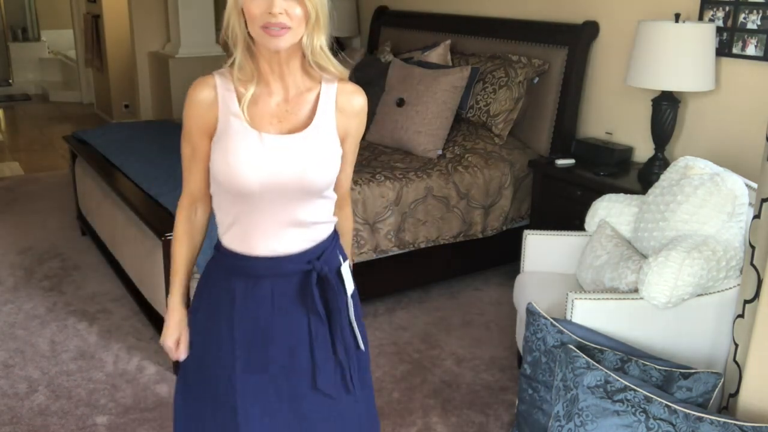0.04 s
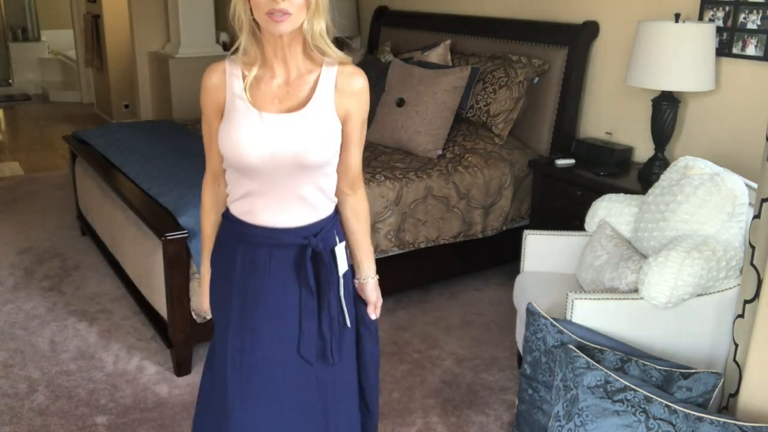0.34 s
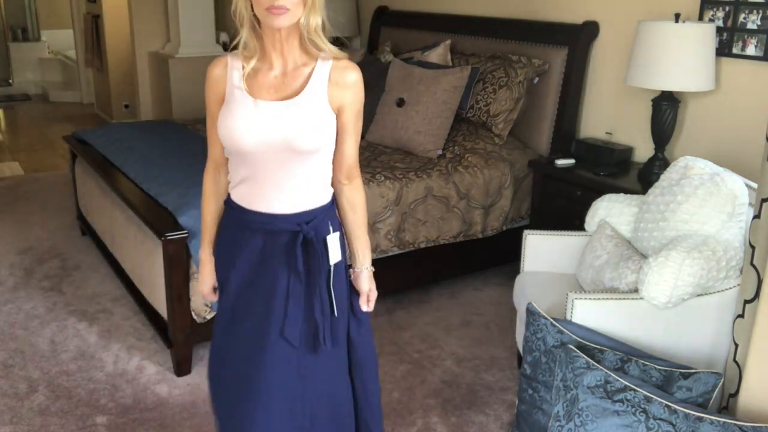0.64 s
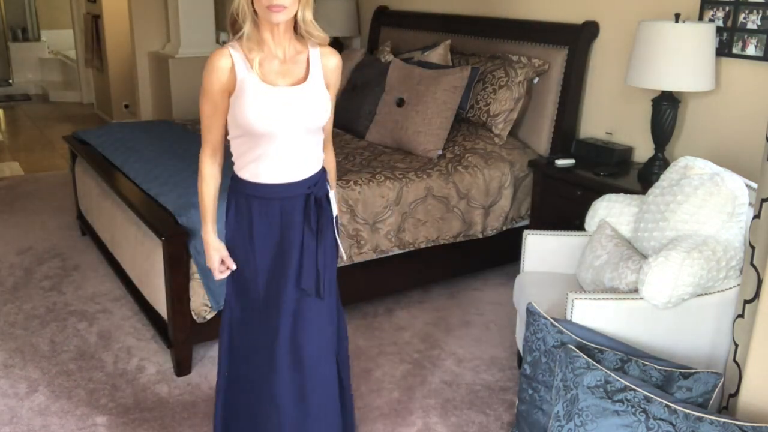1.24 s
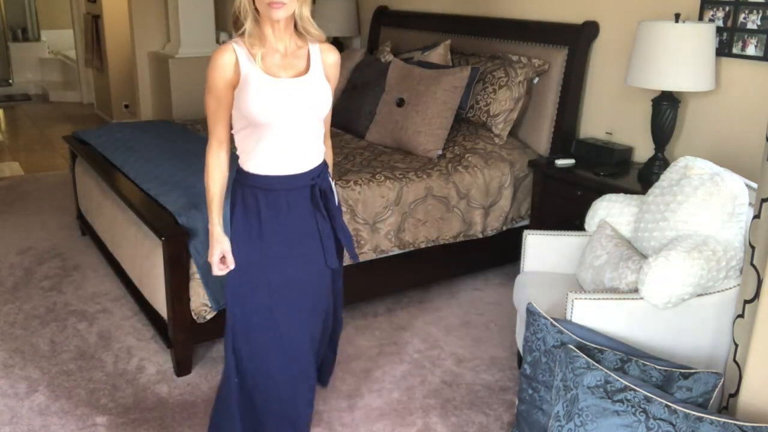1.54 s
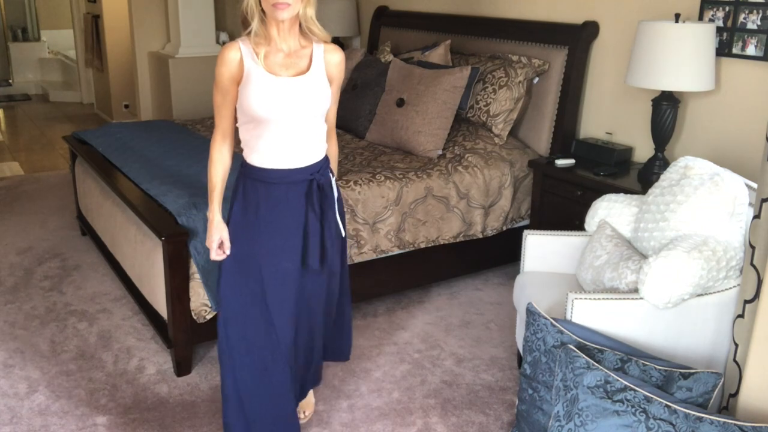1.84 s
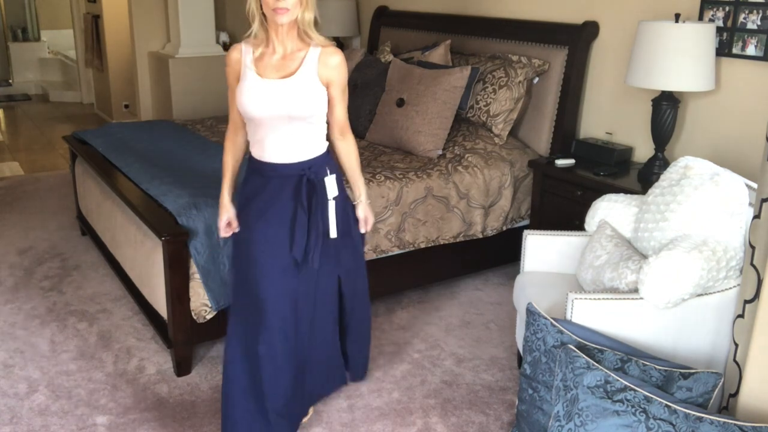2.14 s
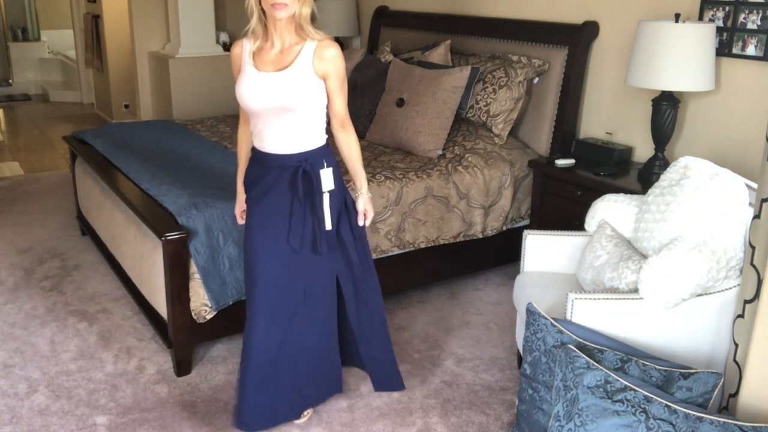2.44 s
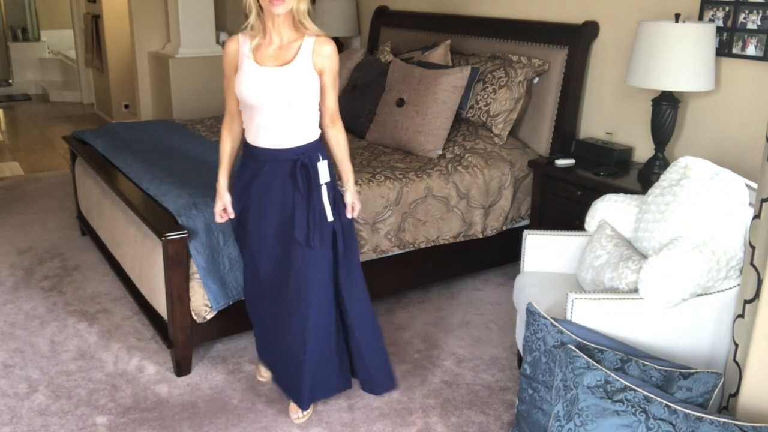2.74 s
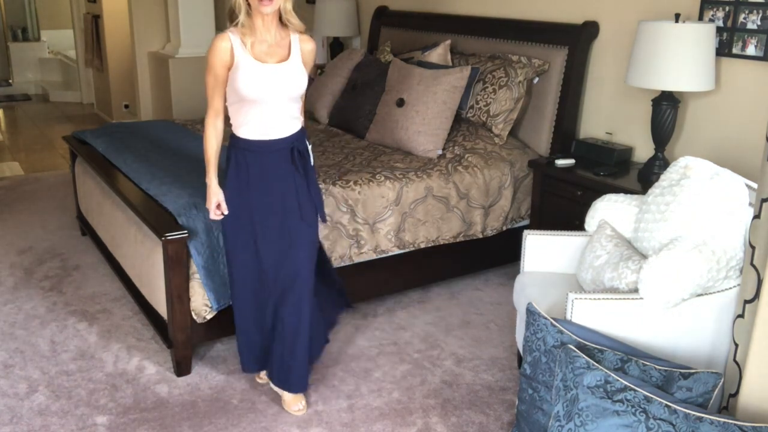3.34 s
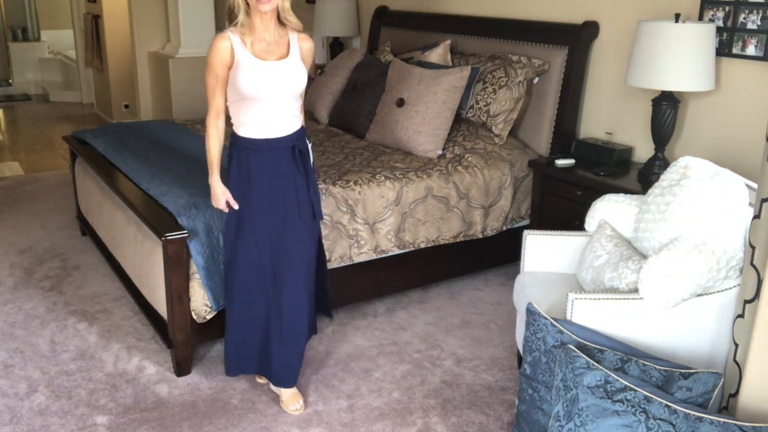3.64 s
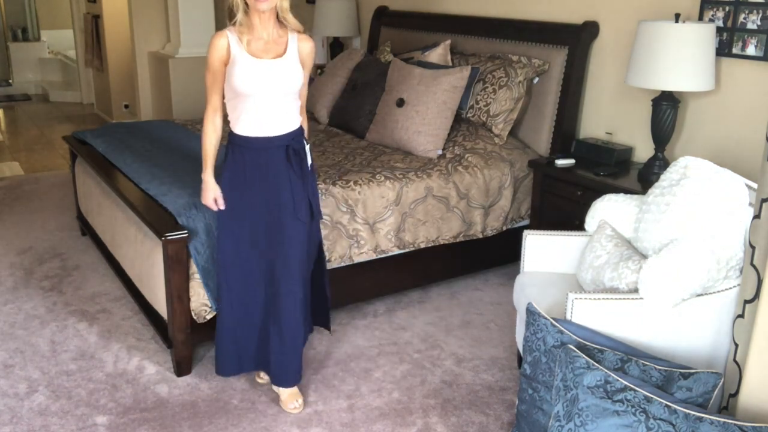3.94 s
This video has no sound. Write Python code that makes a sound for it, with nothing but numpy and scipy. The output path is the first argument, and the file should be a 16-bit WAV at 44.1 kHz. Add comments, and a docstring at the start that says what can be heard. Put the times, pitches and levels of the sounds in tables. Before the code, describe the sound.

Soft sandal footsteps on carpet with a swishing skirt, over a low ventilation rumble.

```python
"""A quiet, carpeted bedroom, one microphone close to someone stepping slowly backwards.
Ventilation rumbles under a thin microphone hiss throughout. At once sandals scuff the carpet,
a long skirt swishes, and something small and light on the clothing rubs and ticks as it swings.
Soft footfalls follow from about 0.6 s. Later come two faint tones, each followed by a light
sandal tap, and the last swishes and ticks die away near 3.5 s."""
import sys
import numpy as np
from scipy import signal
from scipy.fft import rfft, irfft
from scipy.io import wavfile

SR = 44100
rng = np.random.default_rng(int(sys.argv[2]) if len(sys.argv) > 2 else 0)


def transcribe(u):
    """Save the signal u as a 16-bit wav file named by the first command-line argument.

    u: samples, shape (n,) or (channels, n), limited to [-1, 1]; the rate is SR.
    q: integer samples, one column per channel.
    """
    v = np.clip(np.atleast_2d(u).T, -1, 1)
    q = np.round(v * 32767).astype(np.int16)
    wavfile.write(sys.argv[1], SR, q)


N = 176400


def undb(db):
    """Decibels to gain."""
    return 10 ** (np.asarray(db) / 20)


def unit(x):
    """Scale to rms 1."""
    return x / np.sqrt(np.mean(x ** 2))


def noise():
    """White noise of rms 1."""
    return rng.standard_normal(N)


def since(start):
    """Seconds since a moment, for every sample."""
    return np.arange(N) / SR - start


def fade(t, decay):
    """Sudden start, exponential fall."""
    return (t >= 0) * np.exp(-np.abs(t) / decay)


def swell(t, rise, fall):
    """A rounded rise to a peak at t = 0, then an exponential fall."""
    return np.exp(np.where(t < 0, -(t / rise) ** 2, -np.abs(t) / fall))


def at_level(x, db):
    """Give a short sound its level, with its energy taken over 20 ms."""
    return undb(db) * x * np.sqrt(.02 * SR / np.sum(x ** 2))


def band(x, hz, q):
    """A resonance applied twice, for steep slopes."""
    b, a = signal.iirpeak(hz, q, fs=SR)
    return signal.lfilter(b, a, signal.lfilter(b, a, x))


def colour(x, points, tilt_db=0):
    """Causal filter through (Hz, dB) points, tilted per octave; white noise keeps its power."""
    hz, db = np.array(points, float).T
    octave = np.log2(np.maximum(np.fft.rfftfreq(N, 1 / SR), 1))
    curve_db = np.interp(octave, np.log2(hz), db) + tilt_db * np.maximum(octave, np.log2(hz[0]))
    cepstrum = irfft(np.log(unit(undb(curve_db))), N)
    cepstrum[1:N // 2] *= 2  # folded for minimum phase
    cepstrum[N // 2 + 1:] = 0
    impulse = irfft(np.exp(rfft(cepstrum)), N)
    return irfft(rfft(x, 2 * N) * rfft(impulse, 2 * N))[:N]


def grains(per_s, spread_db=5):
    """Threads catch and slip: uneven little impulses, rms 1."""
    catches = rng.random(N) < per_s / SR
    return unit(catches * np.sign(noise()) * undb(spread_db * noise()))


# Room tone, the spectrum of the moving air: f/Hz, relative level/dB
AIR_SPECTRUM = [(4, 2), (13, 1), (22, -5.5), (30, -14), (45, -17.5), (70, -24), (105, -34.5), (170, -40),
                (250, -46.5), (400, -50.5), (600, -55.5), (1150, -57.5), (1750, -65), (3000, -69.5),
                (6000, -79.5)]
# Low resonances of the ducts and the room: f/Hz, half-width/Hz, level/dB
DUCT_DRONES = [(43, 0.95, -51.5), (60.3, 2.5, -53.5), (89.04, 3.55, -55), (122.74, 2.5, -61.5),
               (128.6, 11, -61), (410.1, 4, -79.5)]

def ventilation(air_db=-27.5):
    """Steady rumble of moving air, with narrow resonances in the bass."""
    f = np.maximum(np.fft.rfftfreq(N, 1 / SR), 1)
    hz, db = np.array(AIR_SPECTRUM).T
    air_gain = undb(np.interp(np.log(f), np.log(hz), db))
    out = undb(air_db) * unit(irfft(rfft(noise()) * air_gain, N))
    for centre, width, level_db in DUCT_DRONES:
        resonance = 1 / (1 + ((f - centre) / width) ** 2)
        out += undb(level_db) * unit(irfft(rfft(noise()) * resonance, N))
    return out


# Soles on the carpet: peak t/s, rise/s, fall/s, level/dB, tilt/(dB/octave), rasp f/Hz, rasp level/dB
SOLE_SCUFFS = [(.045, 0.33, 0.12, -59.5, -3, 3850, -72.5), (0.105, 0.005, 0.0072, -70, -1, 2000, -62),
               (.5, 0.046, 0.44, -67, -2.5, 3000, -82), (.86, 0.026, 0.091, -66, -4, 3000, -80),
               (1.0, 0.062, 0.081, -69.5, -2, 2310, -73.5), (1.203, 0.0045, 0.017, -53, -15, 2670, -70),
               (1.731, 0.053, 0.088, -78, -3.5, 2800, -75), (2.165, 0.12, 0.08, -65.5, -2.5, 3280, -76.5),
               (2.33, 0.093, 0.078, -66.5, -6, 1250, -73.5), (2.565, 0.043, 0.49, -68, -3.5, 3070, -78.5),
               (2.77, 0.12, 0.41, -64.5, -9, 5260, -81.5), (3.14, 0.026, 0.15, -66.5, 1, 3130, -75.5),
               (3.4, .04, 0.08, -82, 4, 2820, -80)]
# Spectrum of a brushing sole: f/Hz, relative level/dB
SOLE_SPECTRUM = [(150, -7), (400, -5), (900, 2), (1800, -5.5), (3300, -11.5), (5500, -7.5), (10000, -9.5),
                 (16000, -7)]

def scuffs():
    """Down at the floor, soles brush softly through the carpet pile, whose fibres rasp."""
    out = 0
    for peak, rise, fall, db, tilt_db, rasp_hz, rasp_db in SOLE_SCUFFS:
        brush = undb(db) * colour(noise(), SOLE_SPECTRUM, tilt_db)
        rasp = undb(rasp_db) * unit(band(noise(), rasp_hz, q=2.2))
        out += (brush + rasp) * swell(since(peak), rise, fall)
    return out


# The small piece dragging on the cloth: peak t/s, rise/s, fall/s, level/dB, resonance f/Hz
PIECE_RUBS = [(.072, .01, .012, -72, 3400), (.095, 0.032, 0.02, -77, 4350),
              (.985, 0.0089, 0.032, -66.5, 2320), (1.003, 0.019, 0.099, -73, 3500)]

def rubs():
    """Around its first ticks the light piece drags over the weave: a soft, papery rustle."""
    out = 0
    for peak, rise, fall, db, hz in PIECE_RUBS:
        rustle = unit(band(grains(per_s=1200), hz, q=2.5))
        out += undb(db) * rustle * swell(since(peak), rise, fall)
    return out


# Swings of the skirt: peak t/s, rise/s, fall/s, level/dB, tilt/(dB/octave)
SKIRT_SWISHES = [(0.097, 0.017, 0.01, -54.5, 12.5), (.36, 0.072, 0.066, -70.5, -2),
                 (.52, 0.018, 0.027, -71, 10), (.66, 0.068, 0.14, -75, 6), (.997, 0.018, 0.046, -68, 2),
                 (1.088, 0.078, 0.076, -68, 1), (1.53, 0.049, 0.037, -72.5, -0.5),
                 (2.6, 0.077, 0.047, -78, -1), (3.157, .01, .012, -74, 5), (3.196, 0.009, 0.011, -62, -0.5),
                 (3.38, 0.023, .025, -66.5, -6.5), (3.484, .009, .012, -71, -10.5)]
# Spectrum of the cloth, heard close: f/Hz, relative level/dB
CLOTH_SPECTRUM = [(500, -15), (2000, 1.5), (4000, -3.5), (5500, 3), (8000, 2.5), (10500, 4.5), (14500, -1),
                  (16000, -5.5)]
# Airy sheen where the cloth slides fastest: peak t/s, rise/s, fall/s, level/dB, centre f/Hz
CLOTH_SHEENS = [(.997, .012, .01, -64, 13800), (1.08, .03, 0.034, -70, 14000),
                (3.158, .005, .011, -69, 13800)]

def skirt():
    """Dense grains swell with each swing of the cloth; the fastest slides add a high sheen."""
    out = 0
    for peak, rise, fall, db, tilt_db in SKIRT_SWISHES:
        friction = grains(per_s=3800) * swell(since(peak), rise, fall)
        out += undb(db) * colour(friction, CLOTH_SPECTRUM, tilt_db)
    for peak, rise, fall, db, hz in CLOTH_SHEENS:
        sheen = unit(band(noise(), hz, q=4.5))
        out += undb(db) * sheen * swell(since(peak), rise, fall)
    return out


# Contacts of the swinging piece: t/s, click level/dB, ring level/dB, glint f/Hz, glint level/dB
PIECE_TICKS = [(.098, -75, -87, 14600, -64), (0.105, -71, -71, 7700, -71), (.9540, -81, -73, 13900, -76),
               (.9727, -69.5, -60.5, 13500, -83), (.9775, -84, -71, 9000, -84),
               (1.0167, -71, -65, 14600, -74), (1.025, -83, -72, 13600, -84),
               (2.94, -80.5, -88.5, 11300, -79), (3.1563, -75, -82, 14000, -74),
               (3.199, -75, -88, 9200, -76), (3.3205, -78, -93, 13000, -75), (3.35, -73, -74.5, 9500, -74),
               (3.366, -78, -90, 14200, -78), (3.436, -80, -88, 13500, -77), (3.462, -83, -92, 13900, -75),
               (3.482, -81, -75.5, 14200, -80)]
# Modes it rings with: f/Hz, relative level/dB, t60/s
PIECE_MODES = [(2330, -11, 0.02), (3140, -1, 0.015), (3556, 7.5, 0.012), (3900, 0, 0.0093),
               (6300, -4, 0.0083)]
# Spectrum of its click: f/Hz, relative level/dB
CLICK_SPECTRUM = [(500, -33), (3000, -6), (8000, 2), (11000, 5), (14000, 8), (16000, -16)]

def ticks(detune=.03):
    """The piece on the clothing makes tiny hard contacts: a click, a short ring and a high glint."""
    clicks, rings = 0, 0
    for start, click_db, ring_db, glint_hz, glint_db in PIECE_TICKS:
        t = since(start)
        clicks += at_level(noise() * fade(t, decay=.0008), click_db)
        ring = 0
        for hz, db, t60 in PIECE_MODES:
            mode_hz = hz * (1 + detune * rng.standard_normal())
            ring += undb(db) * fade(t, t60 / np.log(1000)) * np.sin(2 * np.pi * mode_hz * t)
        glint = band(noise(), glint_hz, q=7.9) * fade(t, decay=.0054)
        rings += at_level(ring, ring_db) + at_level(glint, glint_db)
    return colour(clicks, CLICK_SPECTRUM) + rings


# Thuds on the padded floor: peak t/s, level/dB, f/Hz
FLOOR_THUDS = [(0.618, -43, 84), (1.16, -68, 310), (1.769, -39.5, 71), (1.94, -63, 267),
               (2.555, -60.5, 343), (2.62, -58, 307)]

def footfalls():
    """Weight settles on a foot: a dull, soft thud through the carpet."""
    out = 0
    for peak, db, hz in FLOOR_THUDS:
        thud = unit(band(noise(), hz, q=2.16))
        out += undb(db) * thud * swell(since(peak), rise=.017, fall=.029)
    return out


# Brief tones in the background: peak t/s, level/dB, f/Hz, glide/(Hz/s)
FAINT_TONES = [(1.69, -69.5, 530, 41.2), (2.8, -70, 690, 60.4)]

def tones(width_hz=16.4):
    """A faint, wavering tone rises out of the room tone and sinks back."""
    out = 0
    for peak, db, hz, glide in FAINT_TONES:
        t = since(peak)
        waver = np.cumsum(noise()) * np.sqrt(2 * np.pi * width_hz / SR)  # random walk of the phase
        tone = unit(np.sin(2 * np.pi * (hz + glide * t / 2) * t + waver))
        out += undb(db) * tone * swell(t, rise=.052, fall=.12)
    return out


# Sandal taps: t/s, level/dB, tilt/(dB/octave), ring f/Hz, ring level/dB
SANDAL_TAPS = [(2.1332, -60, 1.1, 1340, -65.5), (3.0916, -61.5, -0.8, 5470, -65)]
# Spectrum of a tap: f/Hz, relative level/dB
TAP_SPECTRUM = [(300, -14), (1400, -6), (2400, -1), (3000, 6), (4150, 5.5), (5300, -9), (6500, -9),
                (7500, -3.5), (8800, 2), (10500, -6), (12500, -2), (15500, -3.5)]

def taps(touch_s=.002, touch_db=-9, snap_db=-4):
    """The sandal touches, snaps against the foot and dies away in a few milliseconds."""
    out = 0
    for start, db, tilt_db, ring_hz, ring_db in SANDAL_TAPS:
        t = since(start)
        touch = undb(touch_db) * ((t > -touch_s) & (t < 0))
        envelope = touch + fade(t, decay=.0042)
        slap = at_level(noise() * envelope, db)
        snap = at_level(signal.unit_impulse(N, int(start * SR)), db + snap_db)
        ring = at_level(band(noise(), ring_hz, q=3.9) * envelope, ring_db)
        out += colour(slap - snap, TAP_SPECTRUM, tilt_db) + ring
    return out


def bedroom(x, t60_s=.25, tail_db=-9.5, gap_s=.0022):
    """At close range the direct sound stands well above the short tail of the furnished room."""
    tail = noise() * fade(since(gap_s), t60_s / np.log(1000))
    tail /= np.sqrt(np.sum(tail ** 2))
    return x + undb(tail_db) * signal.fftconvolve(x, tail)[:N]


def scene():
    """What reaches the microphone, in mono: the person moving nearby, over the room's background."""
    background = ventilation() + tones()
    person = taps() + ticks() + rubs() + skirt() + scuffs() + footfalls()
    return (background + bedroom(person))[None]


# Self-noise of the microphone: f/Hz, relative level/dB
MIC_HISS = [(100, -8), (3000, 0.5), (6000, 3.5), (10000, 1.5), (15000, 0.2)]

def record(dry, hiss_db=-72, edge_s=.008, top_hz=15680):
    """The microphone adds its hiss; the ends are eased and the top is cut steeply."""
    hiss = undb(hiss_db) * colour(noise(), MIC_HISS)
    edges = signal.windows.tukey(N, 2 * edge_s * SR / N)
    lowpass = signal.ellip(16, .1, 80, top_hz, fs=SR, output="sos")
    return signal.sosfilt(lowpass, (dry + hiss) * edges)


dry = scene()
out = record(dry)
transcribe(out)
```